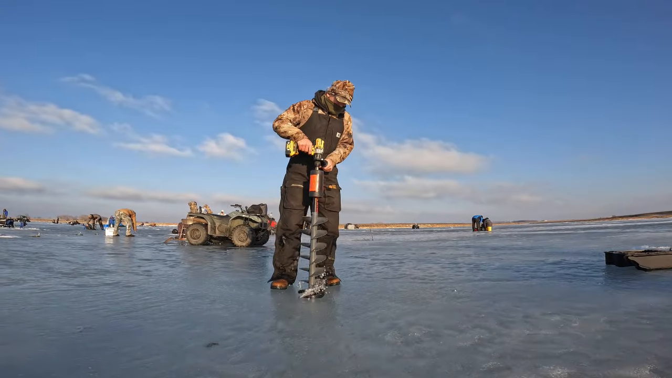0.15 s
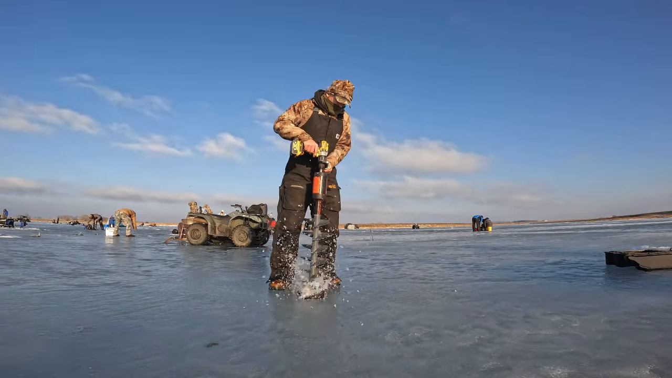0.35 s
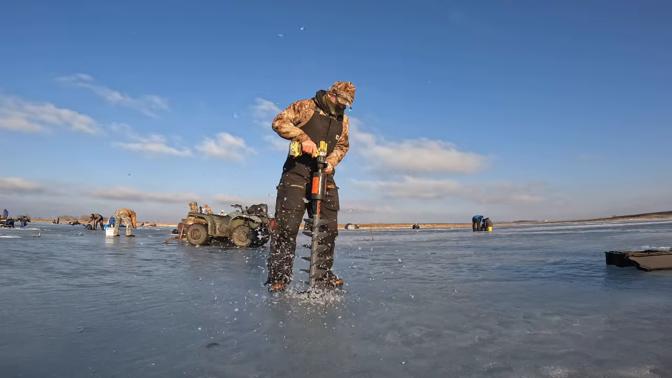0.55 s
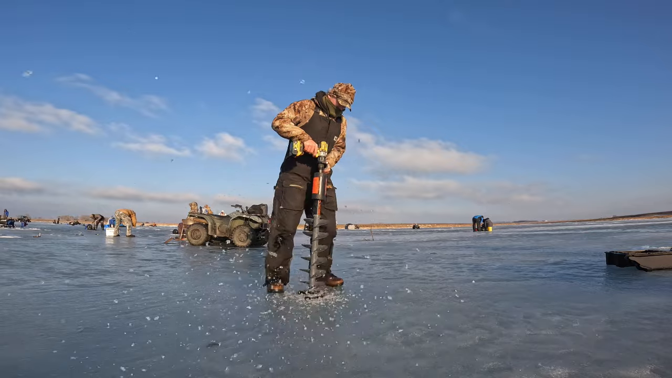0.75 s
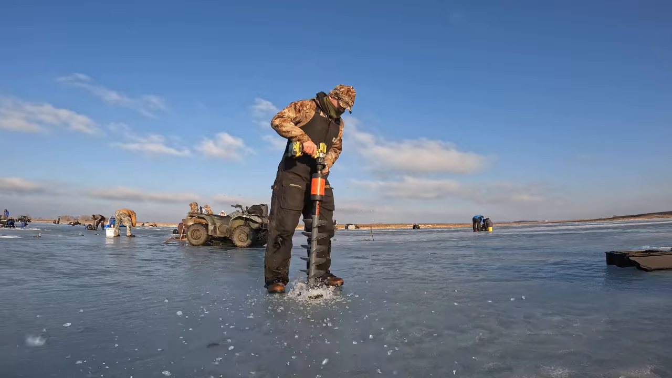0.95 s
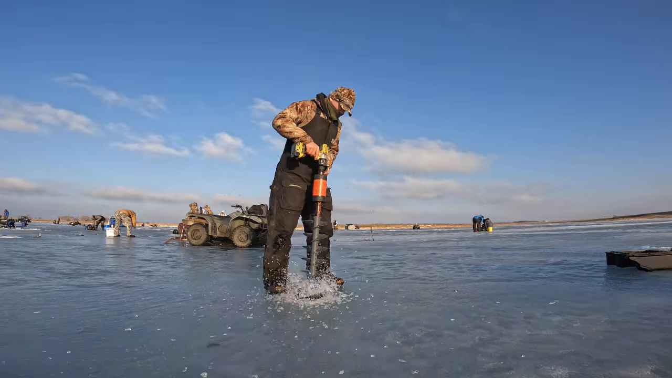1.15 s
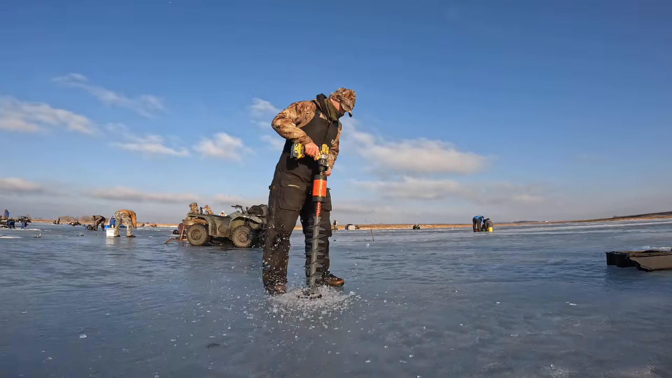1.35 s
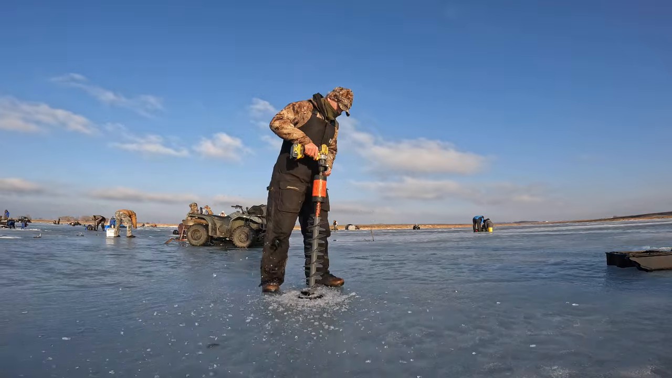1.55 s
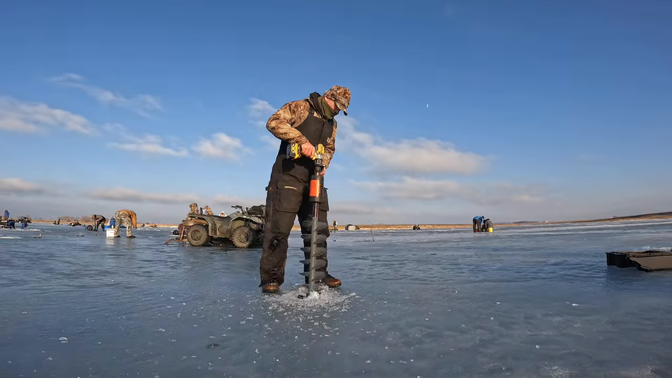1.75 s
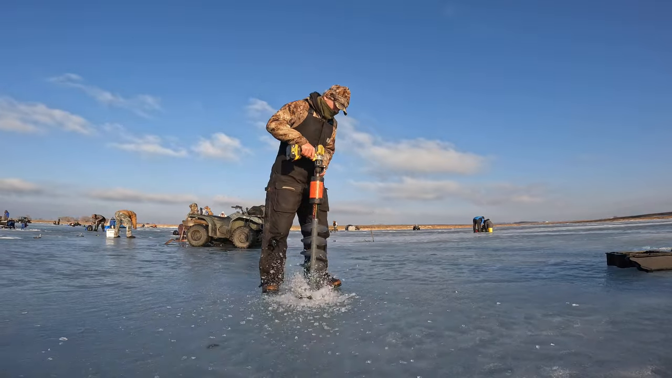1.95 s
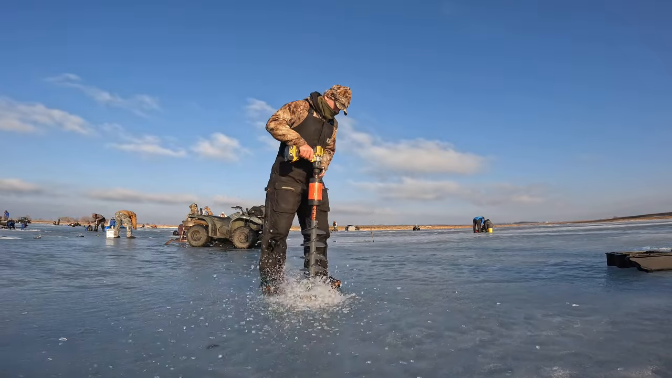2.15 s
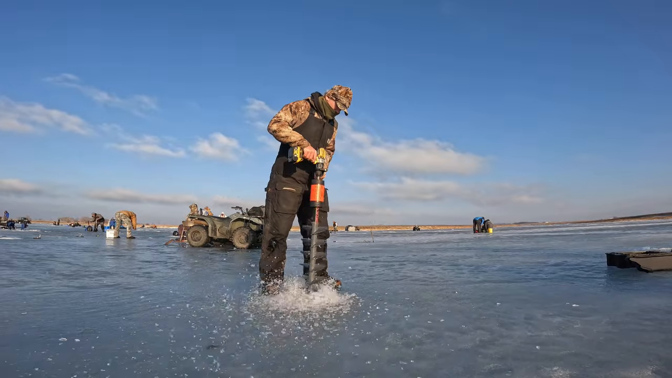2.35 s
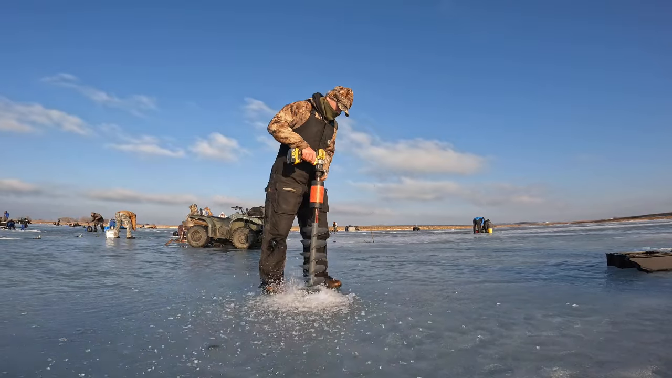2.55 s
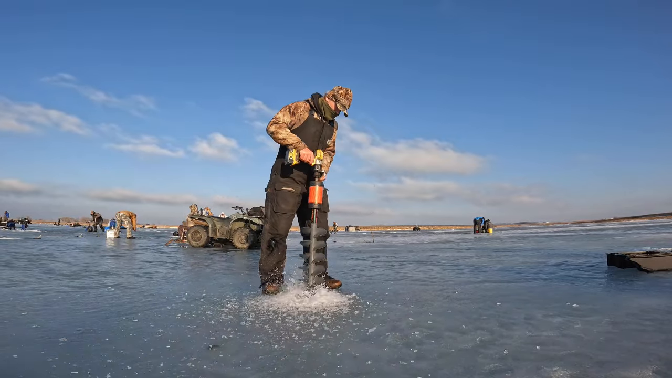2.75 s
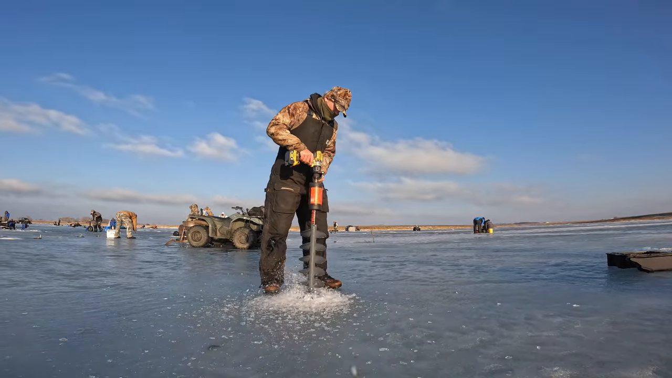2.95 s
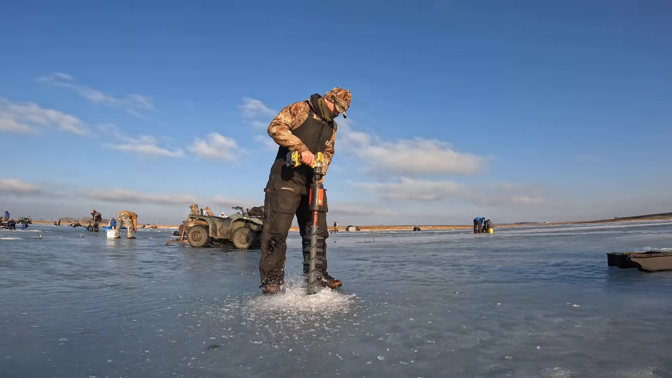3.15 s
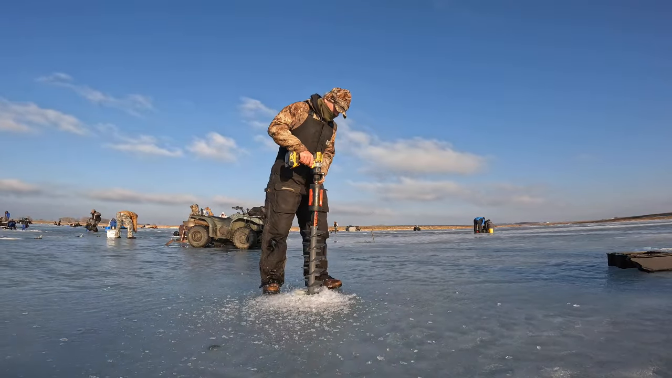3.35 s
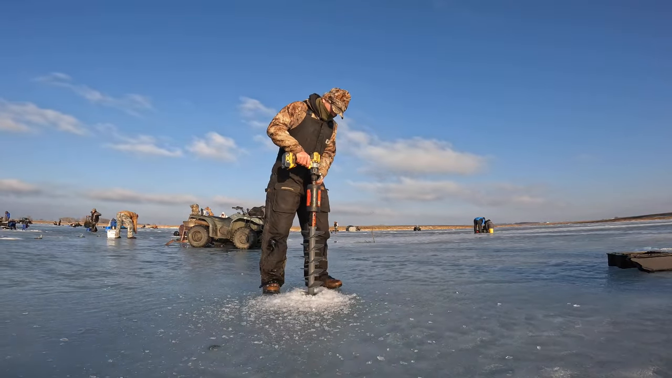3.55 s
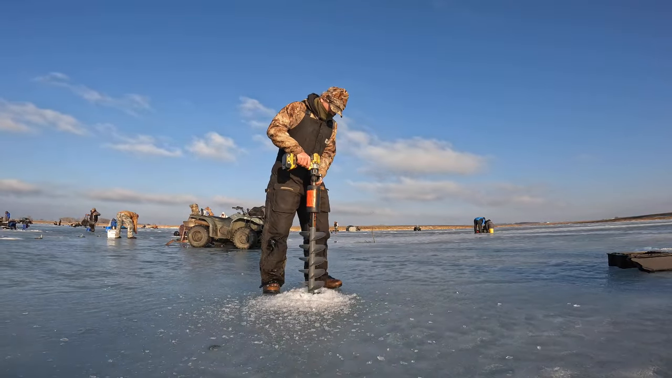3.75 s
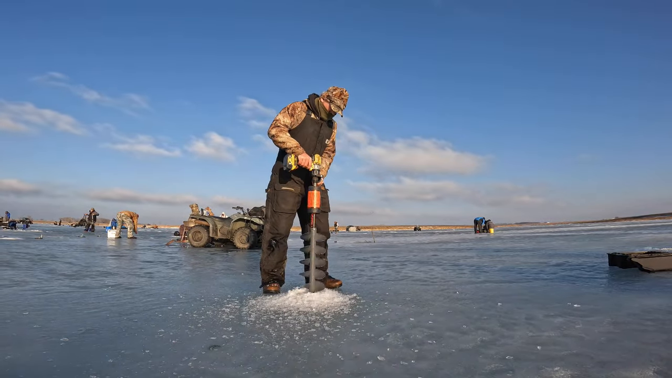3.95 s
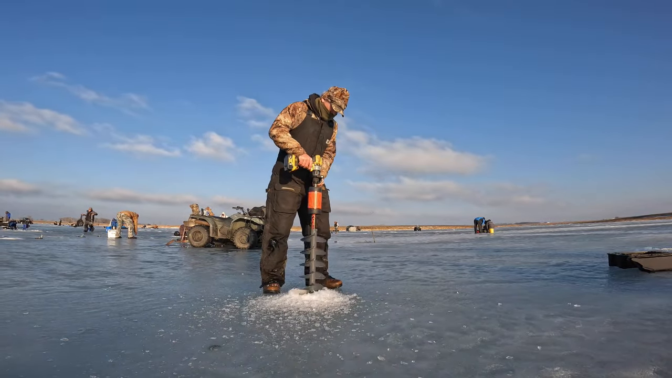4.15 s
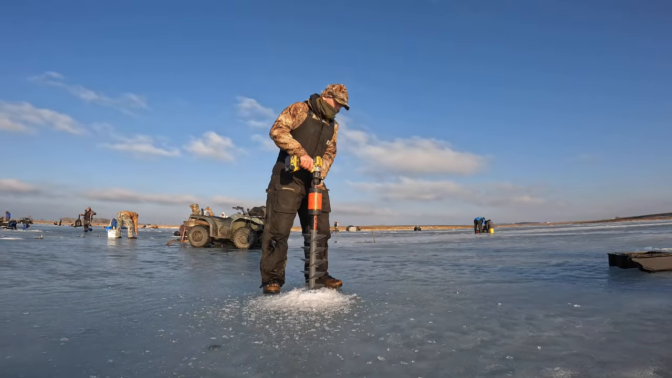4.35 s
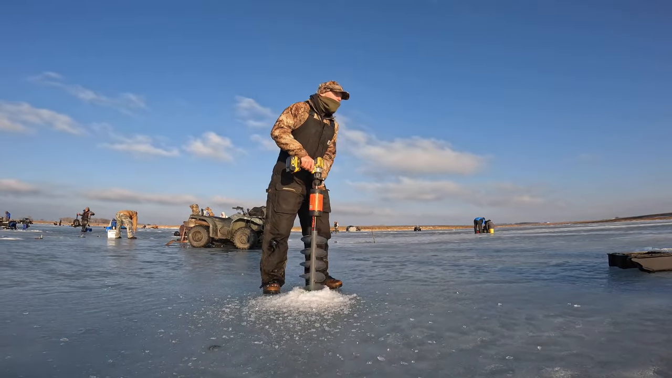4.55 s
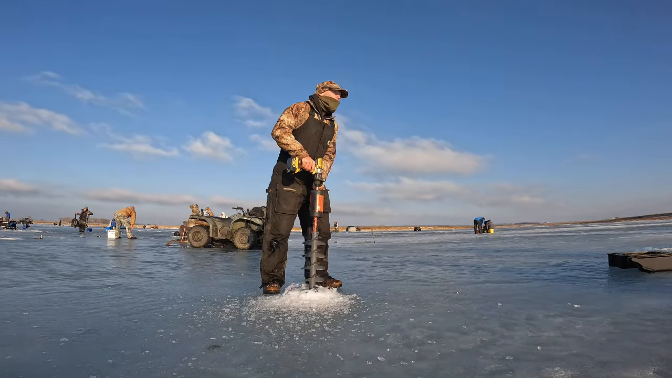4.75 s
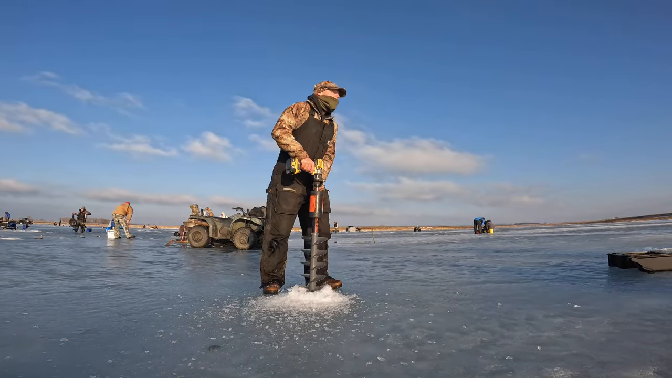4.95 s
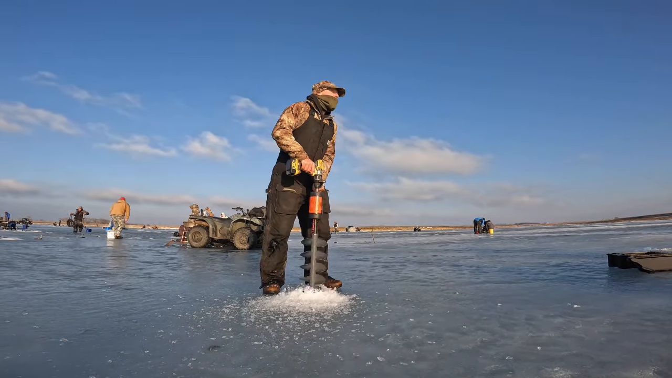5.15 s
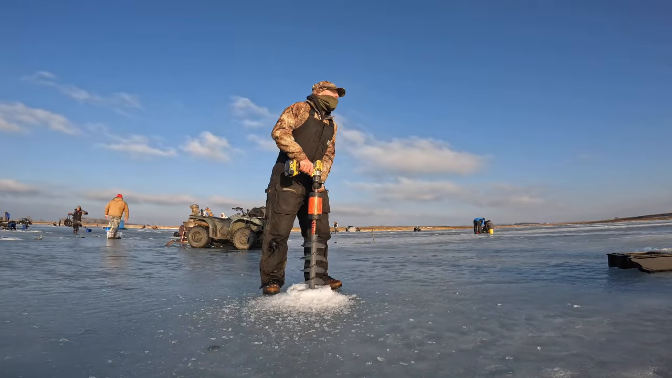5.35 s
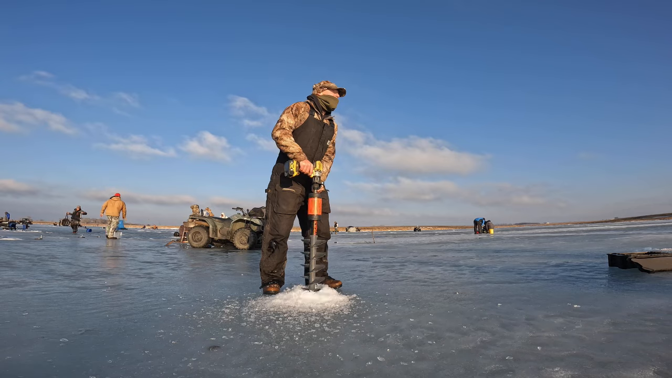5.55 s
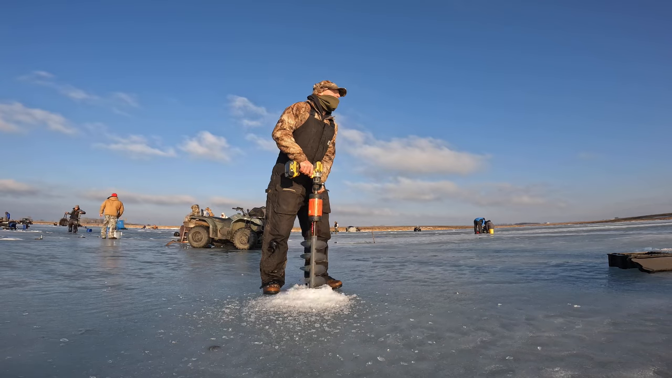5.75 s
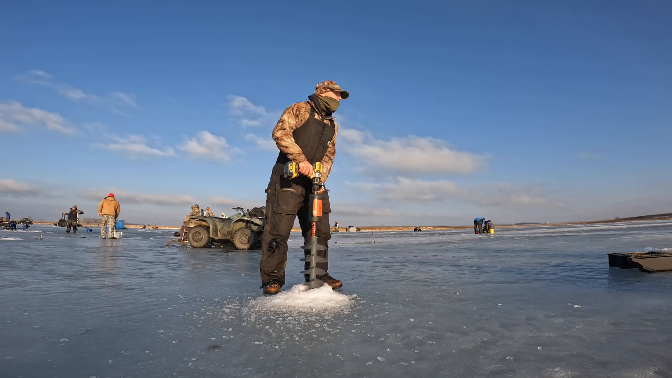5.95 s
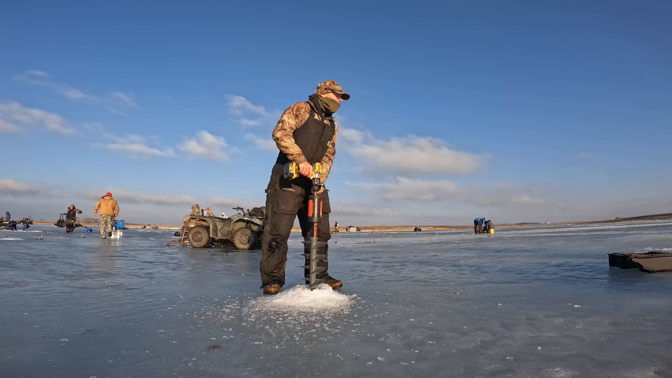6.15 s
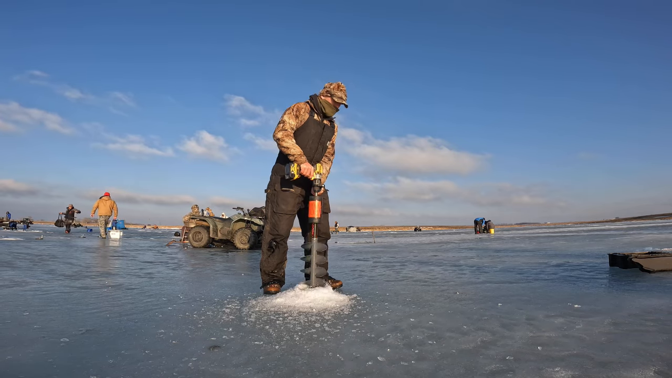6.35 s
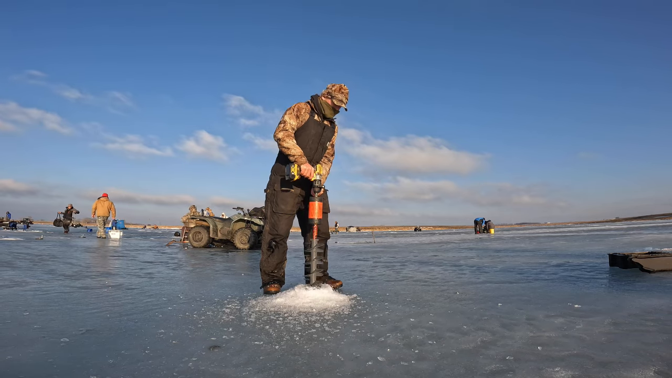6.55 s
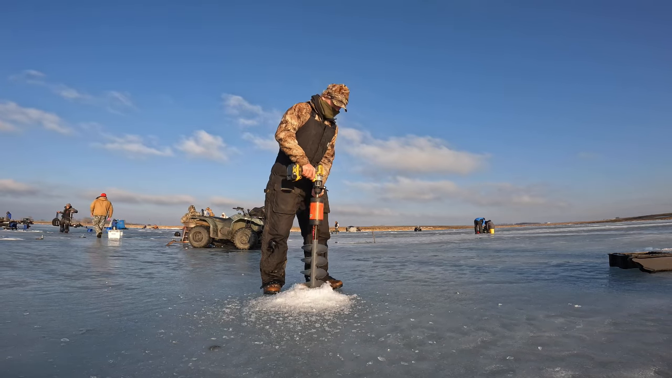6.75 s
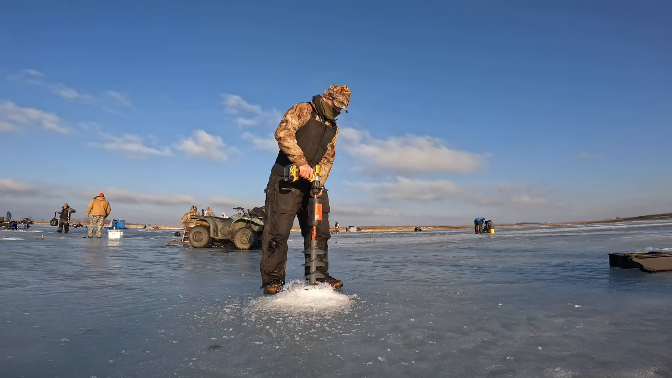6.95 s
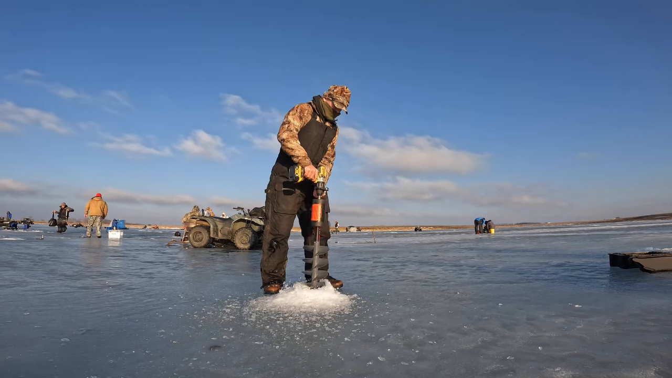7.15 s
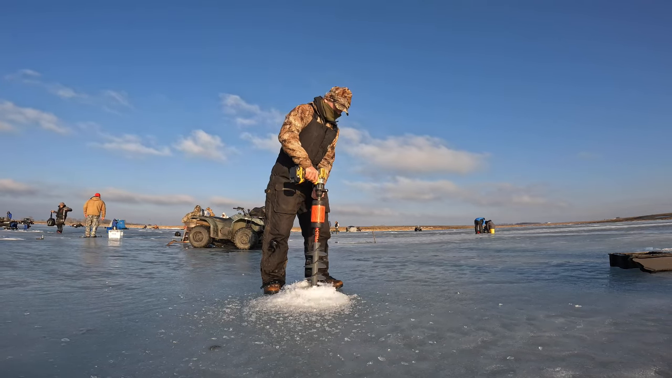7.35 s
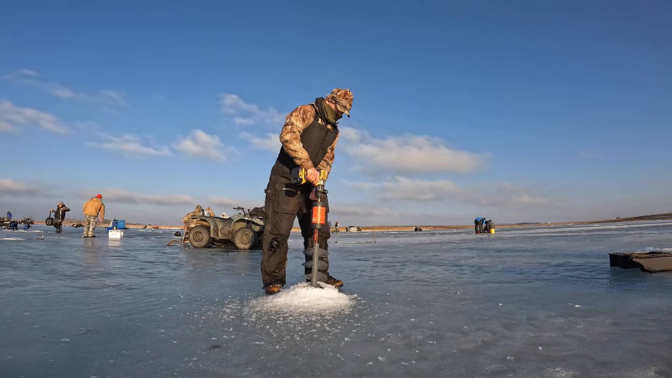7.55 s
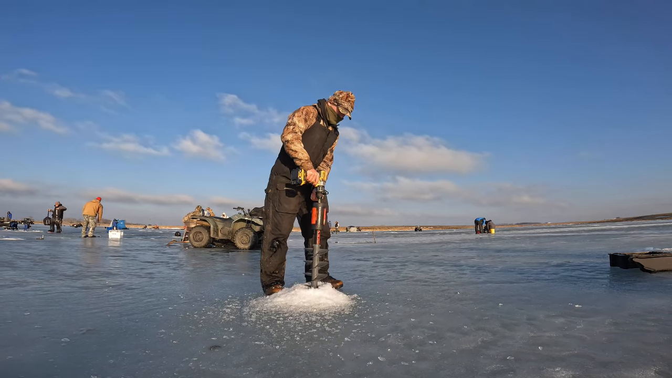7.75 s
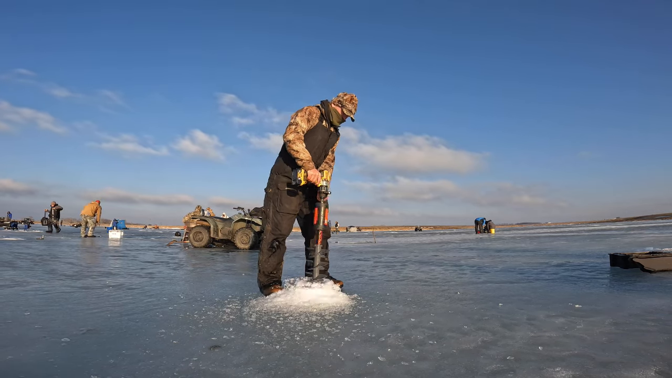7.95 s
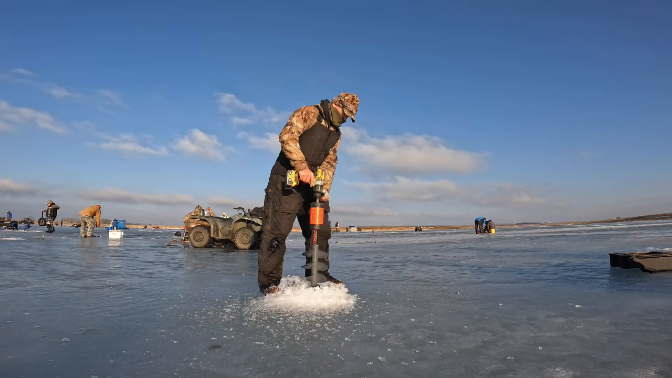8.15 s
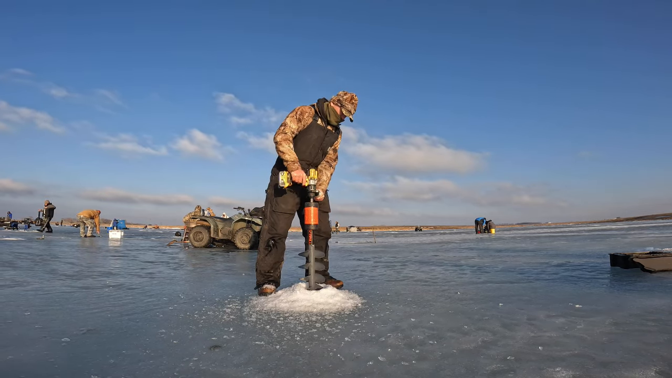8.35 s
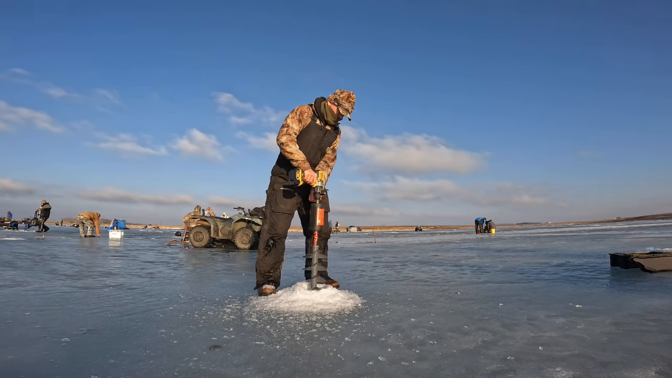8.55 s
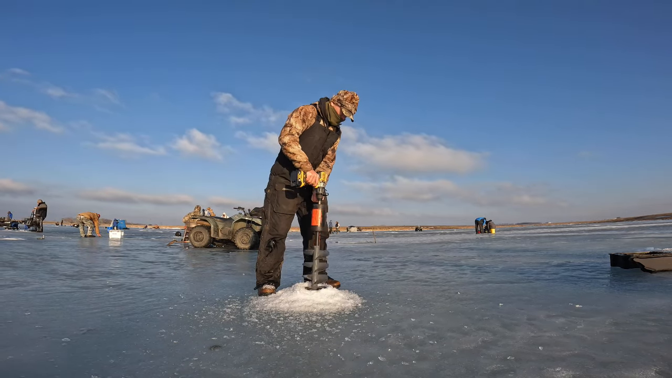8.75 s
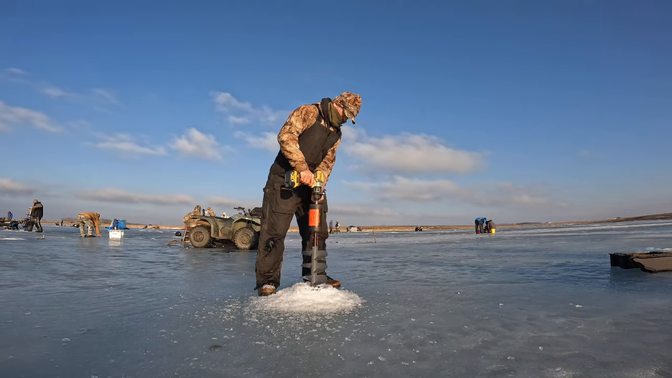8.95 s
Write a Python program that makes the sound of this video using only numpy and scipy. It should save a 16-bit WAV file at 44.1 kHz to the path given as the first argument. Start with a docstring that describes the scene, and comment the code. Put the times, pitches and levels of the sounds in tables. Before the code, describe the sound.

On an open frozen lake, a close, nearly mono microphone rumbles and flutters in wind. A cordless drill spins an ice auger in two half-second bursts, with crushing ice, brief blade squeals and gear whine, shavings pattering afterwards. A long bore follows, its bright crunch dulling as the hole deepens, then grinding in slush under a roughened whine. After a short pause, a final uneven burst runs to the end.

```python
"""Open frozen lake, a nearly mono microphone in the wind: it rumbles, flutters and puffs throughout; no echo.
A cordless drill turns an ice auger in two short bursts: blades crush ice, ring the tube and squeal, gears whine.
Shavings spray, then patter down and crumbs tick on the lake; a blade chatters before the second burst.
In the long bore the crunch dulls with depth; late on, packed slush drags, grinds and roughens the whine.
After a short pause one more burst, its speed sagging and racing in the slush, runs to the end."""
import sys
import numpy as np
from scipy import signal
from scipy.fft import rfft, irfft, next_fast_len
from scipy.io import wavfile
from scipy.ndimage import uniform_filter1d, minimum_filter1d, map_coordinates

SR = 44100
rng = np.random.default_rng(int(sys.argv[2]) if len(sys.argv) > 2 else 0)


def dump(signal):
    """Clip the signal to [-1, 1] and save it as 16-bit WAV at the path in sys.argv[1]."""
    limited = np.clip(np.atleast_2d(signal).T, -1, 1)
    pcm = np.round(limited * 32767).astype(np.int16)
    wavfile.write(sys.argv[1], SR, pcm)


N = 397782

# All levels are nominal: the functions add fixed trims and random swells. Spectra give relative levels.
# wind at the microphone: [t/s, rumble level/dB, flutter level/dB]
WIND_LEVEL = [(0, -23, -27), (.88, -30, -40.5), (1.53, -35.5, -40), (1.61, -26, -39.5), (2.42, -25, -36),
              (2.62, -31, -42), (3.27, -34.5, -41), (3.59, -23, -27.5), (4.6, -25, -40), (5.17, -32, -43),
              (6.76, -36.5, -35), (7.94, -26, -31.5), (8.11, -32.5, -32.5), (8.2, -25, -26.5),
              (8.36, -27.5, -35.5), (8.46, -21, -23.5), (9.02, -25, -33)]
# spectra of the wind's rumble, flutter and puffs: [f/Hz, level/dB]
RUMBLE_SPECTRUM = [(8, -4), (22, 1), (60, -3), (110, -4), (170, -14.5), (300, -32), (800, -101)]
FLUTTER_SPECTRUM = [(70, -22), (140, -1.5), (210, -0.5), (320, -8), (500, -13), (900, -23.5), (4000, -88)]
PUFF_SPECTRUM = [(70, -9.5), (150, 4.5), (210, 0), (320, -5), (500, -9), (900, -21.5), (2000, -42),
                 (5000, -81)]
# sudden puffs on the microphone: [t/s, level/dB]
WIND_PUFFS = [(.029, -25.5), (.088, -26.5), (1.582, -32.5), (1.605, -32.5), (1.692, -32), (2.332, -25),
              (8.44, -26), (8.464, -25), (8.53, -19)]
PUFF_RISE_S, PUFF_FALL_S = 0.0023, 0.012  # time constants
# the lake's faint background: [f/Hz, level/dB]
AIR_SPECTRUM = [(300, -8), (1100, -1.5), (3500, -7.5), (6000, -20), (12000, -27.5), (15000, -47)]
AIR_DB = -51.5

# pulls of the trigger: [start t/s, stop t/s, attack/s, release/s, tube ring level/dB, crunch level/dB,
# spray level/dB, gear whine level/dB, patter afterwards level/dB]
TRIGGER_PULLS = [(0.084, 0.52, 0.16, 0.05, -26.5, -25, -42, -29, -19.5),
                 (.87, 1.339, 0.13, 0.066, -25.5, -24, -41, -40, -32.5),
                 (1.777, 8.265, 0.073, 0.13, -25.5, -23.5, -43, -24, -27),
                 (8.535, 9.44, 0.053, 0.068, -28, -22.5, -57, -24.5, -26)]
SPIN_UP_S, WHINE_SWELL_S = .035, .13  # the motor's time constant; the whine builds over this time
# loose shavings land after each burst: fade; ring re its burst's ring gain, spray re its spray gain
PATTER_FALL_DB_PER_S, PATTER_RING_DB, PATTER_SPRAY_DB = 40, -1, 3
# drill speed as the blades skate, bore, and turn in packed slush: [t/s, gear mesh f/Hz]
SKATING_SPEED = [(.18, 1720), (.225, 1865), (.285, 1890), (.36, 1574)]
BORING_SPEED = [(2.0, 1780), (2.16, 1893), (2.3, 1650), (2.4, 1805), (2.58, 1850), (2.65, 1685),
                (2.76, 1894), (2.9, 1763), (3.06, 1883), (3.1, 1717), (3.37, 1865), (3.57, 1665),
                (3.83, 1870), (3.88, 1700), (3.99, 1710), (4.17, 1948), (4.22, 1785), (4.4, 1825),
                (4.48, 1569), (4.83, 1760), (5.09, 1793), (5.24, 1695), (5.37, 1801), (5.43, 1685),
                (5.57, 1857), (5.68, 1669), (5.86, 1780), (5.91, 1680), (6.09, 1822), (6.3, 1645),
                (6.335, 1768), (6.44, 1657), (6.55, 1765), (6.9, 1587), (7.045, 1775), (7.11, 1578),
                (7.238, 1756), (7.56, 1420), (7.9, 1485), (8.04, 1902), (8.13, 1638), (8.25, 1530)]
SLUSHY_SPEED = [(8.58, 1880), (8.645, 1880), (8.71, 1598), (8.79, 1570), (8.825, 1690), (8.85, 1635),
                (8.89, 1660), (8.92, 1844), (8.96, 1983), (9.02, 2000)]
# blades lose their grip (minus) or bite hard (plus): [middle t/s, length/s, grip level/dB]
BLADE_GRIPS = [(0.217, 0.19, -3.5), (0.415, 0.098, 3.5), (.95, 0.064, -4), (1.046, 0.14, 3.5),
               (2.194, 0.055, -1), (2.32, .05, -2), (2.49, 0.045, 5.5), (4.213, 0.044, 1), (6.278, .05, 3),
               (6.71, 0.037, -2), (2.244, 0.075, 4), (2.53, .04, -2.5), (2.573, 0.072, 4.5),
               (2.634, 0.084, -3.5), (2.735, .08, -1), (2.832, 0.12, -6.5), (3.017, 0.071, 3),
               (3.247, .06, 4.5), (3.345, .06, 3), (3.422, .13, -4), (3.577, 0.39, -4), (3.875, .07, 0.5),
               (4.121, .05, -1), (4.165, .07, -4), (4.599, .05, 1), (4.685, 0.044, 5), (5.081, .05, 2.5),
               (5.172, .025, 4.5), (5.307, .07, 2), (5.728, 0.056, -1.5), (5.79, 0.062, 3),
               (6.146, 0.049, 3.5), (6.787, .054, 3.5), (6.91, 0.086, 4.5), (7.0, 0.19, -5),
               (7.162, 0.084, 1), (7.299, 0.23, -3.5), (7.841, 0.051, -1), (7.99, 0.19, -11.5),
               (8.159, 0.32, -5), (8.929, 0.093, -5.5)]
SINK_FROM_S, SINK_S = 1.83, 1.93  # the blades go under the surface; time constant of sinking
DRAG_FROM_S, DRAG_OVER_S = 6.16, 1.55  # shavings pack the hole and drag on the auger

# crunch spectra at the surface, down the hole, and in packed slush: [f/Hz, level/dB]
SHALLOW_CRUNCH = [(700, -13), (1250, -6.5), (1550, 1), (2150, -2), (2450, -5.5), (3050, -4.5), (3800, -3),
                  (4250, -8.5), (4700, -12), (5250, -15.5), (5600, -16.5), (5950, -20.5), (10000, -56)]
DEEP_CRUNCH = [(800, -22.5), (1250, -19), (1420, -11.5), (1780, -3.5), (2150, -10.5), (2950, -19.5),
               (3500, -13.5), (4600, -29), (5200, -26.5), (7300, -44.5), (11000, -50), (15000, -80)]
PACKED_CRUNCH = [(800, -28), (1300, -9.5), (1750, -6), (2300, -9), (2950, -15), (3500, -13.5),
                 (4600, -25.5), (5300, -26), (7300, -38.5), (11000, -44.5), (15000, -78)]
# grinding in the hole: [f/Hz, level/dB]
GRIND_SPECTRUM = [(150, -30), (300, -5), (500, -7), (660, 3), (900, 1), (1200, 0.5), (1450, -13.5),
                  (2500, -82)]
# the auger tube's modes, before sag and wander: [f/Hz, width/Hz, level/dB]
TUBE_MODES = [(1122, 64, -8), (1053, 27, -13.5)]
TUBE_SAG, TUBE_WANDER = .035, .009  # share of pitch lost as ice fills the flights; random wander, share
DEEP_RING_DB, DEEP_CRUNCH_DB, DEEP_GRIND_DB = 3, -11.5, -5  # changes at full depth
GRIND_DB, DRAG_GRIND_DB = -4.5, 8  # nominal grinding re tube ring; gain at full drag
BITE_DB, BITE_PATCH_DB = 0.24, 2.7  # swell of each bite; depth of the crunch's patches of colour

# gears sing out as the load lets go: [middle t/s, length/s, mesh tone gain level/dB,
# high whine gain level/dB, growl gain level/dB]
GEAR_SURGES = [(.27, .28, 7.5, -4, 0), (3.018, .17, 3, 4, 0), (5.4, 1.25, 3.5, 0, 0),
               (7.022, .2, 7.5, 9, -4), (7.291, 0.14, 14.5, 5, 2), (7.951, .08, 8, 15.5, 0),
               (8.634, .11, 15, 11, 7), (8.823, 0.076, 2, 11, -2), (8.887, .07, 8, 13, 6),
               (8.929, 0.062, 13, 4, 4), (8.966, 0.069, 6, 11, 3)]
# partials of the second stage, clean and in slush: [multiple of its mesh rate, level/dB]
HIGH_WHINE_PARTIALS = [(3, -2), (6, -27)]
GROWL_PARTIALS = [(1, 2), (2, -4)]
STAGE_RATIO, MESH_PER_TURN = .656, 420  # second mesh rate re first; first-stage meshings per auger turn
OVERTONE_DB, GROWL_DB = -11, -15  # nominal high whine; growl at full drag; both re gear gain
DRAG_TONE_DB, DRAG_OVERTONE_DB = -12, -5  # changes at full drag
BREAK_UP = 1.4  # the whine falls as blades slip in clear ice: dB per dB of lost grip

# spray off the flights, and its finest hiss: [f/Hz, level/dB]
SPRAY_SPECTRUM = [(4000, -37), (6000, -3.5), (7500, -5), (9400, 2.5), (10700, -10.5), (12000, -9),
                  (13300, -40)]
FINE_SPECTRUM = [(5000, -21.5), (11000, -10), (12000, 6), (13200, -6), (14800, -9), (15700, -25)]
# finest hiss over time: [t/s, level/dB]
FINE_HISS_LEVEL = [(.3, -61), (1.2, -52), (2, -56), (2.8, -53), (3.55, -54), (3.9, -76), (5.2, -71),
                   (5.7, -58), (7.8, -60), (8.15, -55), (8.5, -75)]
# the heap of shavings closes over the flights and smothers the spray
BURIED_S, BURIED_OVER_S, DEEP_SPRAY_DB, BURIED_SPRAY_DB = 3.63, 0.23, -9, -7
FLING_DB = 1.5  # swell as each blade flings out its load

# blades squealing on ice: [t/s, length/s, pitch f/Hz, arch/share of pitch, glide/share of pitch,
# pitch shake/share of pitch, level/dB]
BLADE_SQUEALS = [(.108, 0.068, 3550, .016, 0, .03, -41), (.118, 0.08, 3000, 0, -0.02, .07, -38),
                 (.165, .023, 3440, 0, 0.096, 0.041, -32), (.198, 0.104, 3050, 0.059, .018, 0.011, -27.5),
                 (.26, .116, 4140, .0194, 0, .049, -34), (.298, .03, 3530, .0067, -.17, .02, -33),
                 (.93, 0.41, 5480, .01, 0, .035, -42)]
# crumbs of ice landing on the lake: [f/Hz, level/dB]
CRUMB_SPECTRUM = [(1000, -5), (3000, 0), (6000, -13), (9500, -5.5), (12000, -12), (15000, -30)]
LANDING_DB, LANDING_FALL_DB_PER_S = -60.5, 13  # as a burst stops; fade from there
# a resting blade chatters before it digs in: (start t/s, length/s, slip rate f/Hz, level/dB)
BLADE_CHATTER = (.755, .2, 80, -40)
# ringing of the hard surface: [f/Hz, width/Hz, level/dB]
SURFACE_MODES = [(1300, 500, 3), (3130, 600, 2), (3770, 400, -6)]
CHATTER_SLIP_S = 0.0074  # time constant of each slip's decay
# chips cracking off, before their filter: [t/s, level/dB]
ICE_CHIPS = [(.901, -8), (.925, -10), (1.382, -28), (1.679, -30), (8.442, -32), (8.692, -5.5)]
CHIP_T60_S = .028

TOP_HZ = 15700  # upper band limit


def amp(db):
    """Decibels to gain."""
    return 10 ** (np.asarray(db) / 20)


def unit(x):
    """Scale to rms 1."""
    return x / np.sqrt(np.mean(x ** 2) + 1e-20)


def noise():
    """White noise as long as the scene."""
    return rng.standard_normal(N)


def curves(rows):
    """One value per sample for each column after the time."""
    s, *cols = np.transpose(rows)
    return [np.interp(np.arange(N) / SR, s, c) for c in cols]


def wobble(rate):
    """A smooth random curve, rate knots a second."""
    knots = rng.standard_normal(int(N * rate / SR) + 4)
    return map_coordinates(knots, [np.arange(N) * rate / SR])


def since(start):
    """Seconds since start, zero before it."""
    return np.maximum(np.arange(N) / SR - start, 0)


def ramp(start, length):
    """Rises from 0 to 1 over length seconds."""
    return np.clip((np.arange(N) / SR - start) / length, 0, 1)


def ease(start, length):
    """Rises from 0 to 1 with soft corners."""
    return np.sin(np.pi / 2 * ramp(start, length)) ** 2


def bump(middle, length):
    """Rises from 0 to 1 and falls back."""
    return np.sin(np.pi * ramp(middle - length / 2, length)) ** 2


def filtered(x, response):
    """x times a response of frequency."""
    m = next_fast_len(N + SR // 4)
    return irfft(rfft(x, m) * response(np.fft.rfftfreq(m, 1 / SR)), m)[..., :N]


def colour(x, points):
    """x shaped by (Hz, dB) points on a log axis, at rms 1."""
    f, db = np.transpose(points)
    return unit(filtered(x, lambda hz: amp(np.interp(np.log(hz + 1), np.log(f), db))))


def resonate(x, modes):
    """x ringing in (Hz, width, dB) modes, at rms 1."""
    def response(f):
        return sum(amp(db) * 1j * f * w / (c * c - f * f + 1j * f * w) for c, w, db in modes)
    return unit(filtered(x, response))


def grains(rate, spread_db, hiss):
    """Tiny fractures of unequal size, rate a second on average, over a smooth hiss."""
    sizes = amp(spread_db * np.minimum(rng.exponential(size=N), 4)) * noise()
    fractures = unit(sizes * (rng.random(N) < rate / SR))
    return unit(fractures + hiss * noise())


def patchy(x, depth_db):
    """x with random swells a few hundred Hz wide and some 30 ms long."""
    z = signal.stft(x, nperseg=512)[2]
    field = uniform_filter1d(rng.standard_normal(z.shape), size=3, axis=0)
    field = uniform_filter1d(field, size=5, axis=1)
    return unit(signal.istft(z * amp(depth_db * unit(field)), nperseg=512)[1][:N])


def bend(x, ratio):
    """x with its pitch times a slowly moving ratio."""
    return map_coordinates(x, [np.cumsum(ratio)], mode="mirror")


def wind():
    """Moving air presses on the microphone: low rumble, flutter above it, and puffs that jump up and die away."""
    rumble_db, flutter_db = curves(WIND_LEVEL)
    rumble = colour(noise(), RUMBLE_SPECTRUM) * amp(rumble_db + 1.5 + 1.2 * wobble(16))
    flutter = colour(noise(), FLUTTER_SPECTRUM) * amp(flutter_db - 2.0 + 3.3 * wobble(25))
    force = np.zeros(N)
    for s, db in WIND_PUFFS:
        t = since(s)
        force += amp(db + 7.0) * (1 - np.exp(-t / PUFF_RISE_S)) * np.exp(-t / PUFF_FALL_S)
    return rumble + flutter + force * colour(noise(), PUFF_SPECTRUM)


def lake_air():
    """Steady shaped noise is the faint background of the open lake."""
    return amp(AIR_DB) * colour(noise(), AIR_SPECTRUM)


def trigger():
    """Bursts swell, hold and stop, then shavings patter down: gains of ring, crunch, spray, whine and flow."""
    total = np.zeros((5, N))
    for start, stop, attack, release, ring_db, crunch_db, spray_db, whine_db, patter_db in TRIGGER_PULLS:
        stopped = ease(stop - release, release)
        on = ease(start, attack) * (1 - stopped)
        patter = stopped * amp(patter_db - PATTER_FALL_DB_PER_S * since(stop))
        flow = on + amp(PATTER_SPRAY_DB) * patter
        ring = amp(ring_db) * (on + amp(PATTER_RING_DB) * patter)
        crunch = amp(crunch_db) * (on + patter)
        whine = amp(whine_db) * on * ramp(start, WHINE_SWELL_S)
        total += [ring, crunch, amp(spray_db) * flow, whine, flow]
    return total


def load():
    """What the auger meets: depth 0-1, drag 0-1 and the blades' grip in dB."""
    depth = 1 - np.exp(-since(SINK_FROM_S) / SINK_S)
    grip_db = sum(db * bump(s, length) for s, length, db in BLADE_GRIPS)
    return depth, ramp(DRAG_FROM_S, DRAG_OVER_S), grip_db


def drill_speed():
    """The motor spins up at each pull, then follows the speed tables: gear mesh Hz."""
    cruise_hz, = curves(SKATING_SPEED + BORING_SPEED + SLUSHY_SPEED)
    lag = sum((since(start) > 0) * np.exp(-since(start) / SPIN_UP_S) for start, *_ in TRIGGER_PULLS)
    return cruise_hz * (1 - lag)


def ice_crunch(judder, depth, drag, grip_db):
    """Many small fractures crush the ice; the hole muffles them as it deepens, then slush takes over."""
    cracks = patchy(grains(rate=12000, spread_db=2, hiss=0.78) * judder, BITE_PATCH_DB)
    slush = patchy(grains(rate=6000, spread_db=0.5, hiss=0.81) * judder, BITE_PATCH_DB)
    muffled = ramp(1.76, 1.9)
    shallow = amp(2 + np.minimum(grip_db, 0)) * colour(cracks, SHALLOW_CRUNCH)
    deep = amp(6.5) * colour(cracks, DEEP_CRUNCH)
    clear = (1 - muffled) * shallow + muffled * deep
    packed = amp(6.0) * colour(slush, PACKED_CRUNCH)
    crunch = np.sqrt(1 - drag) * clear + np.sqrt(drag) * packed
    return amp(DEEP_CRUNCH_DB * depth) * crunch


def tube_and_grind(judder, depth, drag, grip_db):
    """Fractures ring the tube's modes, whose pitch sags with depth; the ring gives way as grinding grows."""
    grind_db = GRIND_DB + DEEP_GRIND_DB * depth + DRAG_GRIND_DB * drag
    tube = resonate(grains(rate=3000, spread_db=2, hiss=0.91), TUBE_MODES)
    tube = bend(tube, 1 - TUBE_SAG * depth + TUBE_WANDER * wobble(12))
    tube = colour(tube, [(400, -32), (850, 4.5), (1250, 0.0), (1500, -15.0), (3000, -2),
                         (10000, -20), (15000, -34)])
    tube *= amp(2.0) / (1 + amp(grind_db) ** 2)
    rubble = grains(rate=3500, spread_db=2, hiss=0.62) * judder
    grind = amp(grind_db + 2.5) * colour(rubble, GRIND_SPECTRUM)
    return amp(DEEP_RING_DB * depth + grip_db + 0.74 * wobble(36)) * (tube + grind)


def blades(turns, ring_gain, crunch_gain, depth, drag, grip_db):
    """Two blades bite on each turn, swelling the crunch and the ringing together."""
    bite_db = BITE_DB * np.sin(4 * np.pi * turns + wobble(3.01)) + 0.55 * wobble(50)
    judder = amp(0.9 * wobble(260))
    ring = ring_gain * tube_and_grind(judder, depth, drag, grip_db)
    return amp(bite_db) * (ring + crunch_gain * ice_crunch(judder, depth, drag, grip_db))


def gearbox(mesh_hz, turns, gain, drag, grip_db):
    """Meshing teeth whine in two stages; bites rock the speed, drag roughens it, and surges run cleaner."""
    tone_db, whine_db, growl_db = sum(np.outer(dbs, bump(s, length)) for s, length, *dbs in GEAR_SURGES)
    strain = drag * amp(-np.maximum(np.maximum(tone_db, whine_db), 0))
    speed = 1 + .005 * np.sin(4 * np.pi * turns) * (1 - drag) + .008 * wobble(55)
    jolts = (.009 + .015 * strain) * wobble(350)
    phase = 2 * np.pi * np.cumsum(mesh_hz * (speed + jolts)) / SR
    stage_phase = STAGE_RATIO * phase
    tone_db = tone_db + DRAG_TONE_DB * drag + BREAK_UP * (1 - drag) * np.minimum(grip_db, 0)
    whine_db = whine_db + OVERTONE_DB + DRAG_OVERTONE_DB * drag
    tone_gain = amp(tone_db - 2.5 + 2.4 * wobble(40) + 0.97 * wobble(130))
    tone = tone_gain * np.sin(phase + 0.5 * wobble(160))
    whine = sum(amp(whine_db + db + 2.5 * wobble(70)) * np.sin(k * stage_phase + .5 * wobble(200))
                for k, db in HIGH_WHINE_PARTIALS)
    growl = drag * sum(amp(GROWL_DB + growl_db + db + 2.2 * wobble(40)) * np.sin(k * stage_phase)
                       for k, db in GROWL_PARTIALS)
    return gain * (tone + whine + growl)


def shavings(turns, spray_gain, flow, depth):
    """Fine ice grains hiss off the flights, swelling with each blade; only the finest hiss has any width."""
    fine_db, = curves(FINE_HISS_LEVEL)
    spray_db = DEEP_SPRAY_DB * depth + BURIED_SPRAY_DB * ramp(BURIED_S, BURIED_OVER_S)
    spray = colour(grains(rate=8000, spread_db=4.5, hiss=0.96), SPRAY_SPECTRUM)
    fine = np.array([colour(grains(rate=2500, spread_db=4.0, hiss=0.7), FINE_SPECTRUM) for side in range(2)])
    fine_gain = flow * amp(fine_db + [[.5], [3.5]])  # left, right trims in dB
    fling = amp(FLING_DB * np.sin(4 * np.pi * turns + wobble(4.3)) + 1.7 * wobble(15))
    return fling * (spray_gain * amp(spray_db) * spray + fine_gain * fine)


def squeals():
    """A blade sticks and slips: a short tone that arches or glides, or a whirr when the slips are uneven."""
    out, shake = np.zeros(N + SR), wobble(900)
    for s, length, hz, arch, glide, rough, db in BLADE_SQUEALS:
        first = int(s * SR)
        u = np.linspace(-1, 1, int(length * SR))
        pitch = hz * (1 - arch * u ** 2 + glide * u + rough * shake[first:][:len(u)])
        tone = np.sin(2 * np.pi * np.cumsum(pitch) / SR)
        out[first:][:len(u)] += amp(db + 6.5) * (1 - u ** 2) * tone
    return out[:N]


def crumbs():
    """Flung crumbs of ice tick on the lake, fading from the stop of each burst."""
    gain = sum((since(stop) > 0) * amp(LANDING_DB - LANDING_FALL_DB_PER_S * since(stop))
               for _, stop, *_ in TRIGGER_PULLS)
    return gain * colour(grains(rate=660, spread_db=-7, hiss=0.48), CRUMB_SPECTRUM)


def chatter():
    """A blade skips over the hard surface in quick, even slips that ring it briefly."""
    start, length, rate, db = BLADE_CHATTER
    slips = np.exp(-(since(start) % (1 / rate)) / CHATTER_SLIP_S) * noise()
    ringing = resonate(slips, SURFACE_MODES)
    ringing = unit(filtered(ringing, lambda hz: 1 / (1 + (hz / 4400) ** 8)))
    return amp(db) * np.sqrt(bump(start + length / 2, length)) * ringing


def chips():
    """Larger chips snap off with a dry, bright tick: noise that starts sharply and decays fast."""
    out, t = np.zeros(N + SR), np.arange(SR // 10) / SR
    for s, db in ICE_CHIPS:
        snap = amp(db - 60 * t / CHIP_T60_S) * (1 - np.exp(-t / 0.00027))
        out[int(s * SR):][:len(t)] += snap * rng.standard_normal(len(t))
    return filtered(out[:N], lambda hz: hz / (hz + 400) / (1 + (hz / 4500) ** 5))


def scene():
    """The drill's speed drives gears and blades together, out in the wind."""
    ring, crunch, spray, whine, flow = trigger()
    depth, drag, grip_db = load()
    mesh_hz = drill_speed()
    turns = np.cumsum(mesh_hz) / SR / MESH_PER_TURN
    auger = blades(turns, ring, crunch, depth, drag, grip_db)
    auger = auger + gearbox(mesh_hz, turns, whine, drag, grip_db)
    ice = shavings(turns, spray, flow, depth) + squeals() + crumbs() + chatter() + chips()
    return wind() + lake_air() + auger + ice


def record(dry):
    """The limiter behind the microphone eases the peaks of both sides alike; then the band limit cuts."""
    needed = np.minimum(1, amp(-6.5) / (np.abs(dry).max(axis=0) + 1e-9))
    gain = uniform_filter1d(minimum_filter1d(needed, size=200), size=200)
    return filtered(dry * gain, lambda hz: hz < TOP_HZ)


dry = scene()
out = record(dry)
dump(out)
```